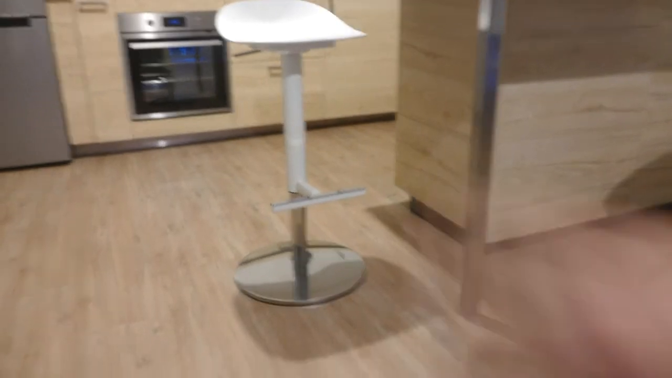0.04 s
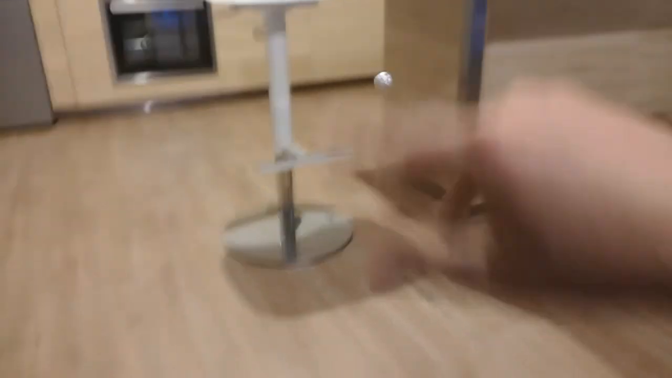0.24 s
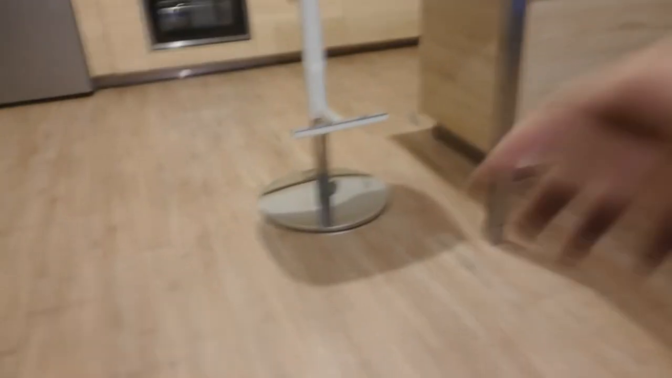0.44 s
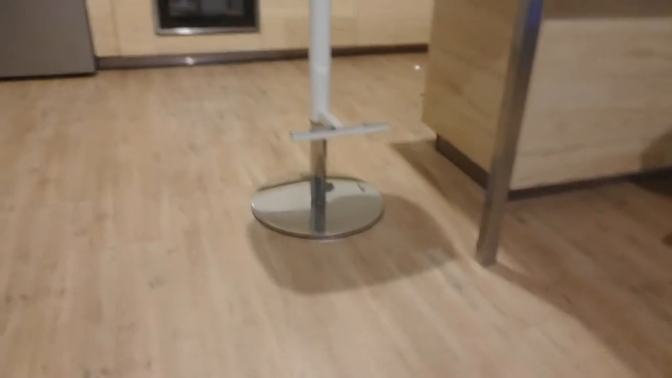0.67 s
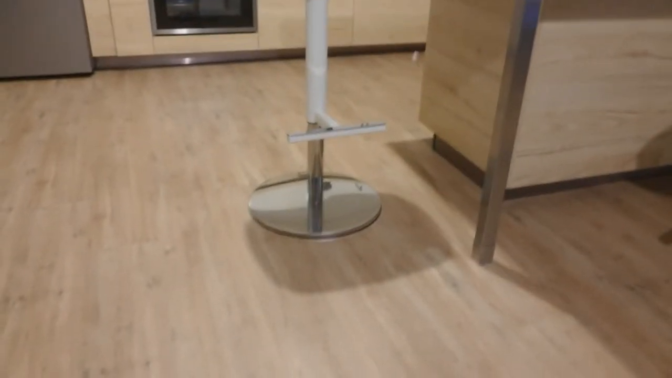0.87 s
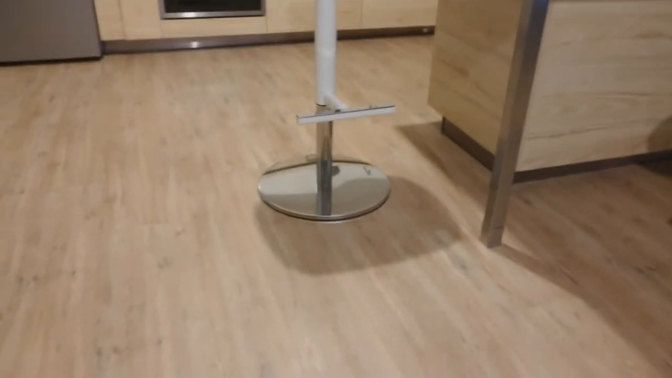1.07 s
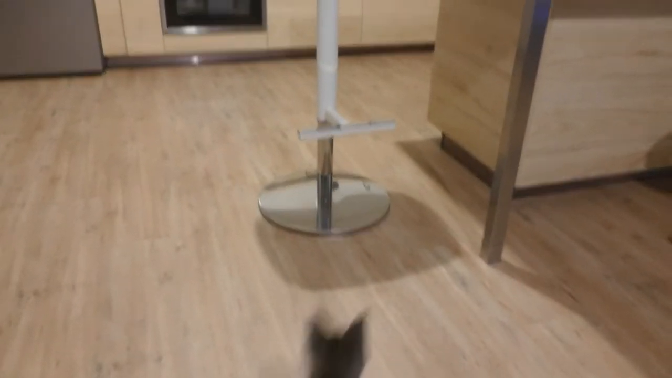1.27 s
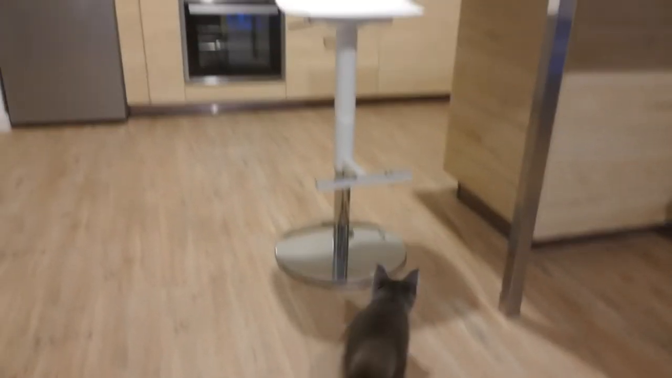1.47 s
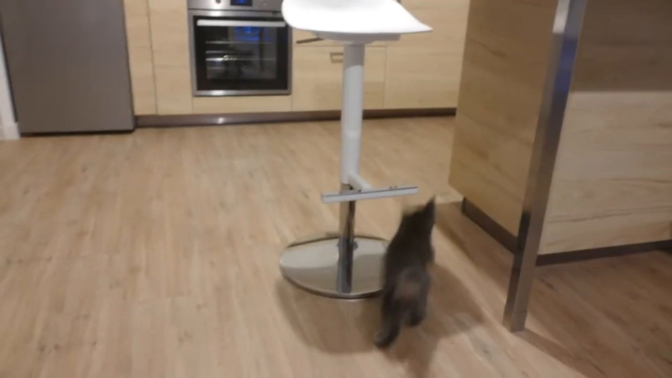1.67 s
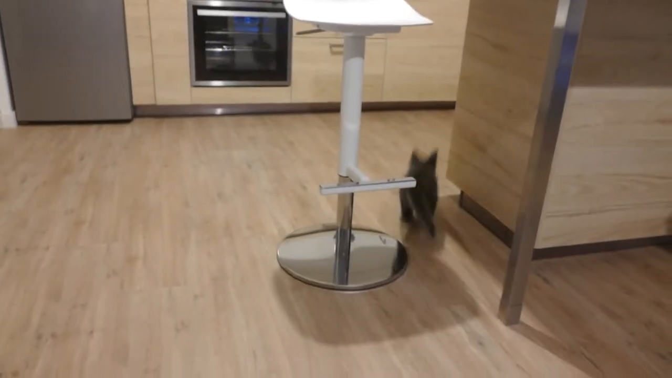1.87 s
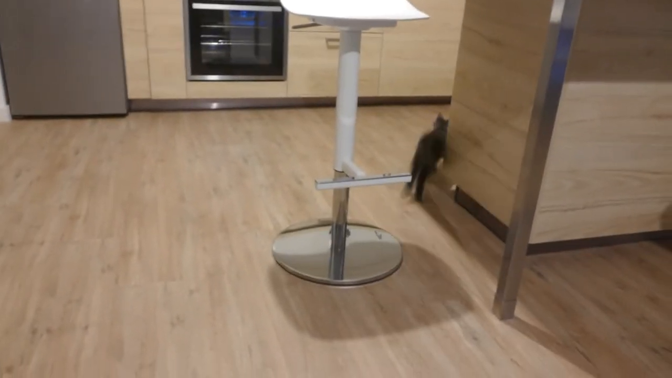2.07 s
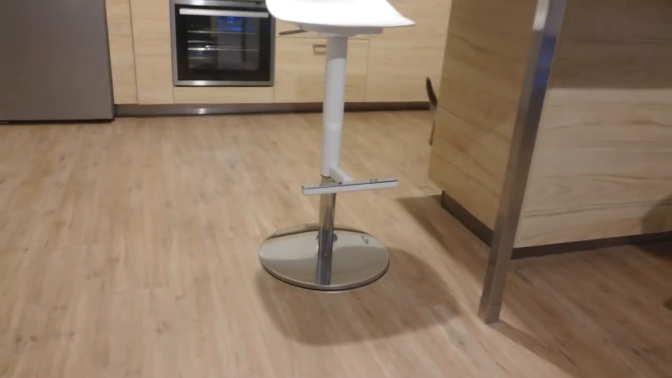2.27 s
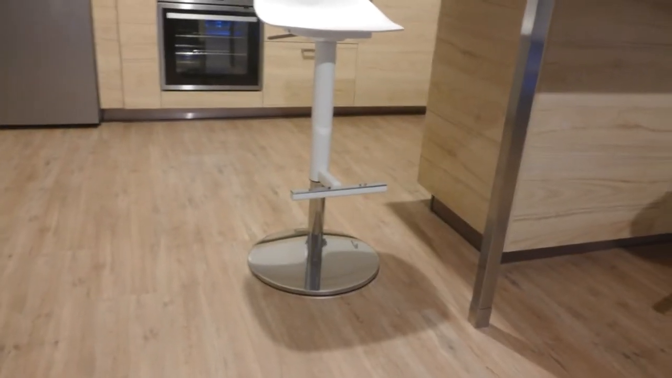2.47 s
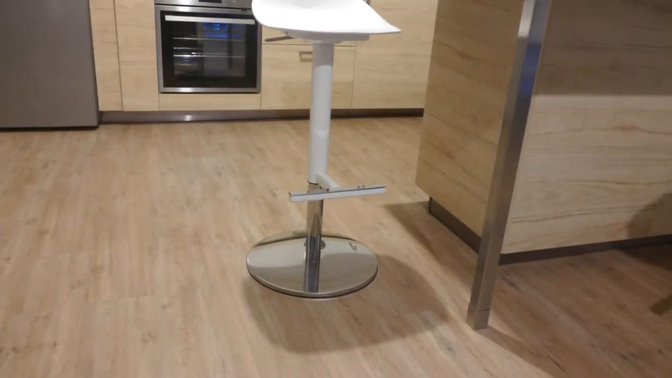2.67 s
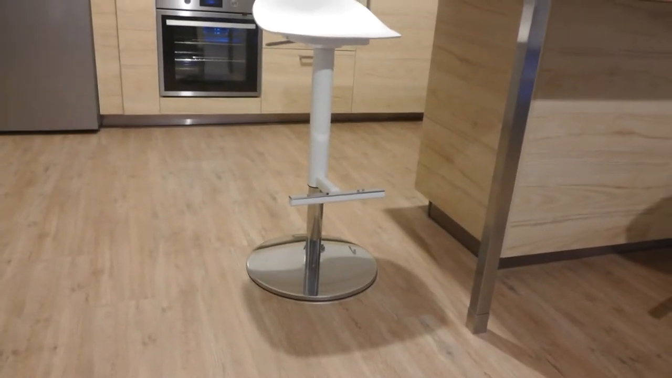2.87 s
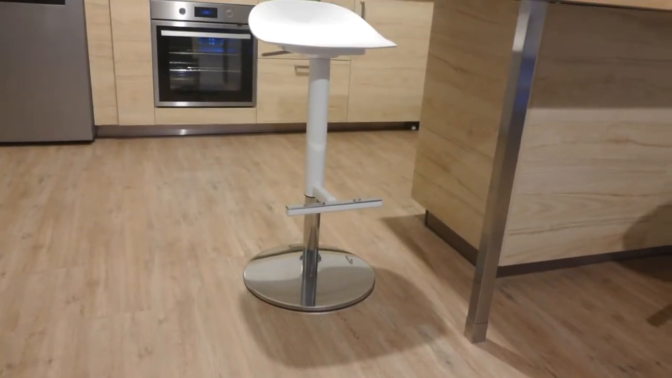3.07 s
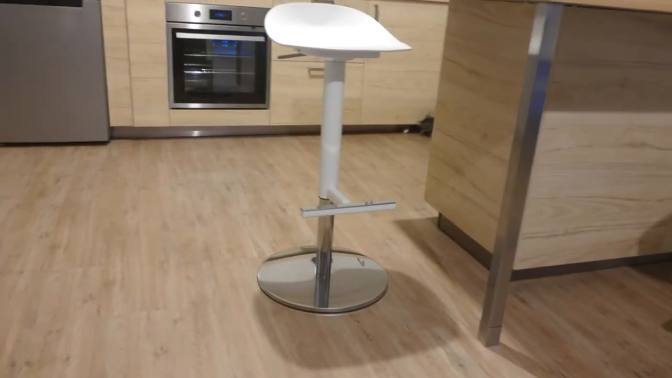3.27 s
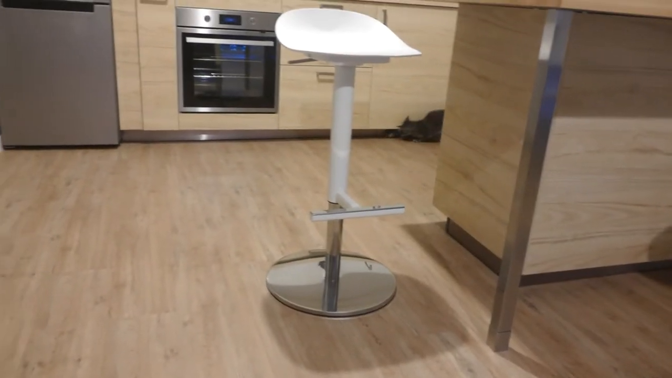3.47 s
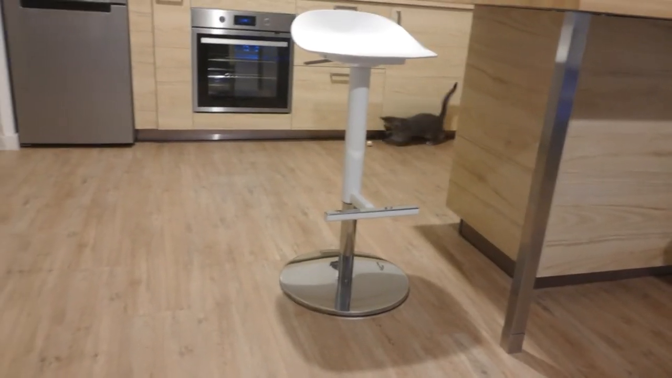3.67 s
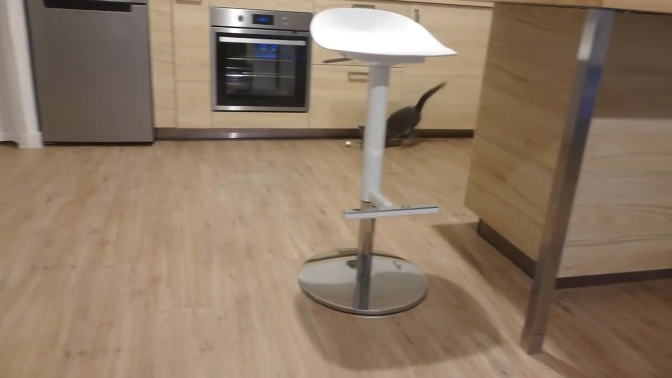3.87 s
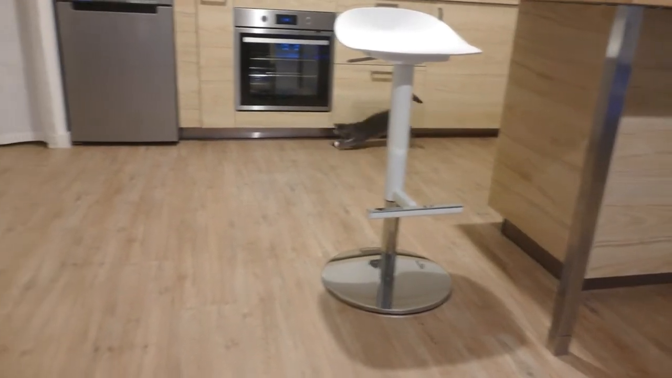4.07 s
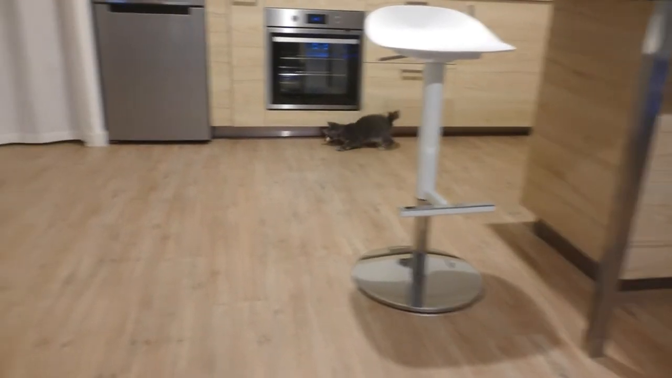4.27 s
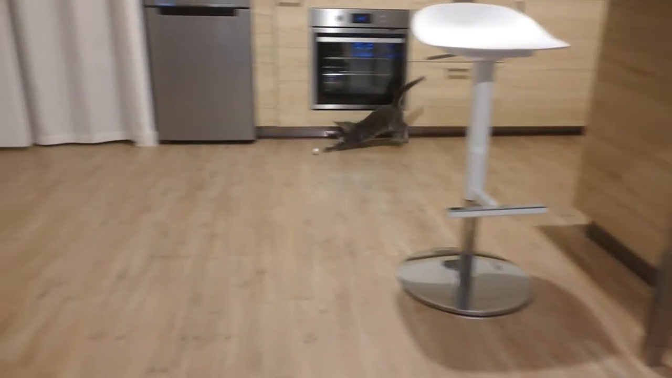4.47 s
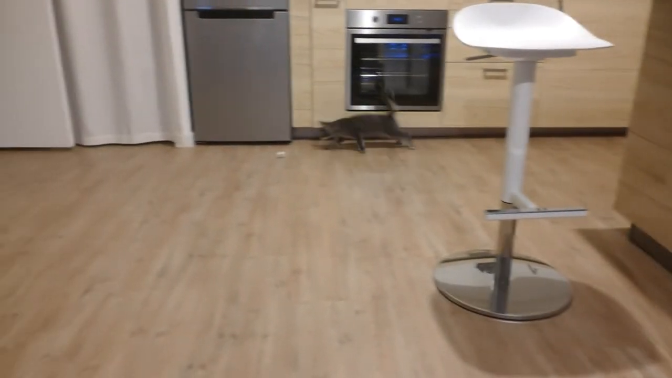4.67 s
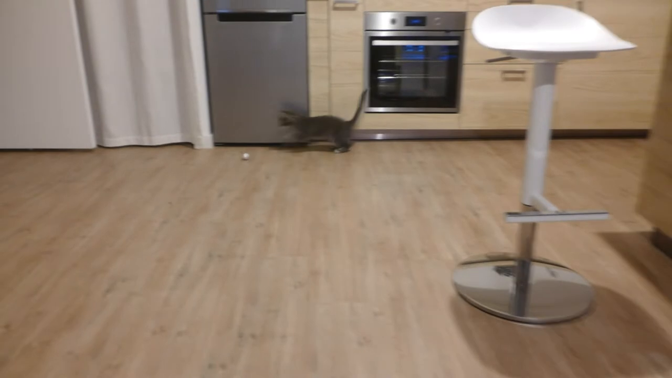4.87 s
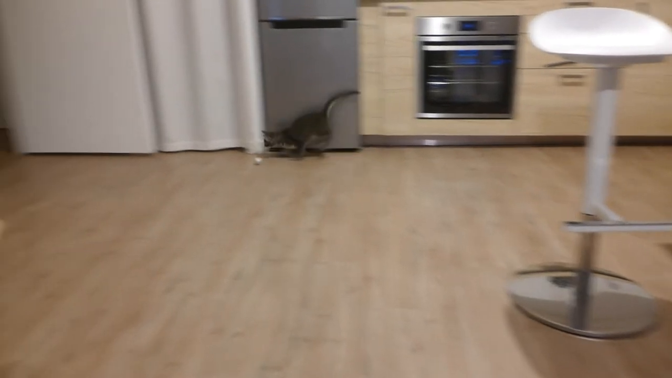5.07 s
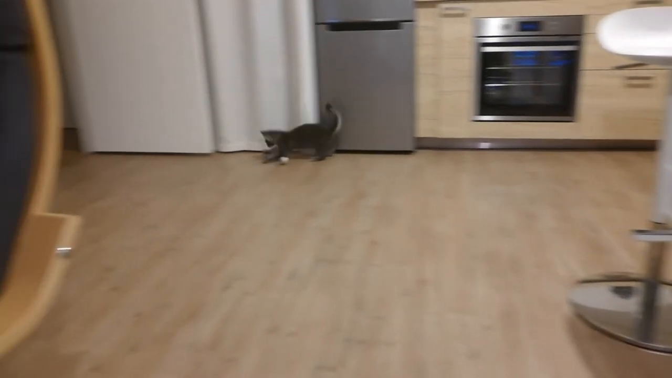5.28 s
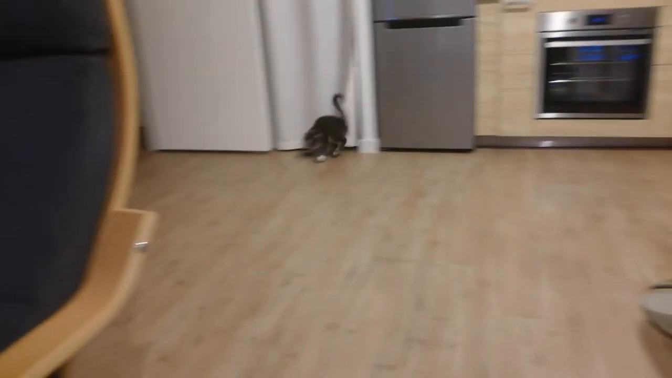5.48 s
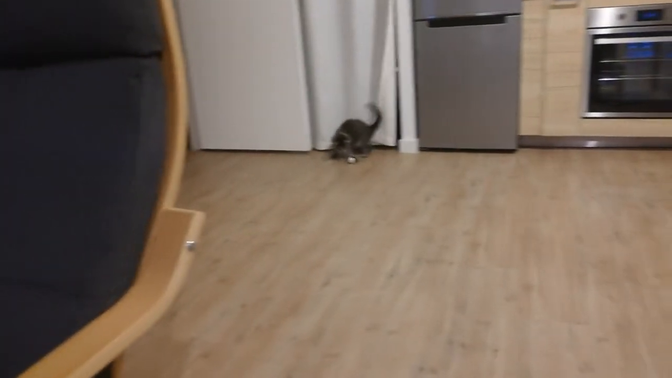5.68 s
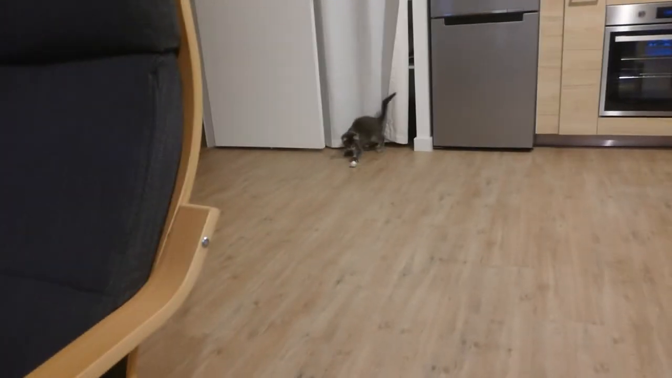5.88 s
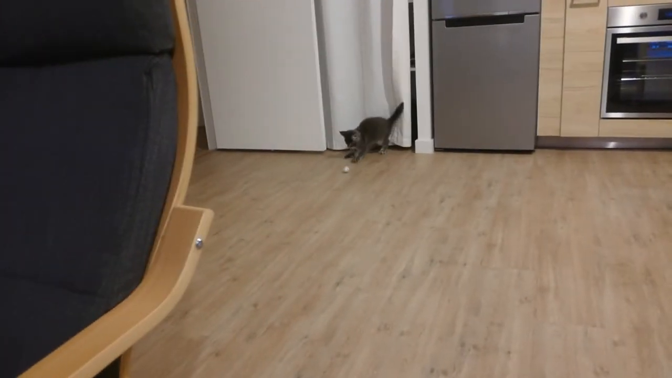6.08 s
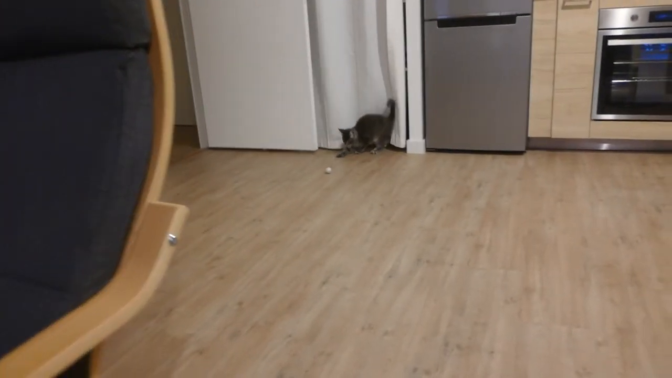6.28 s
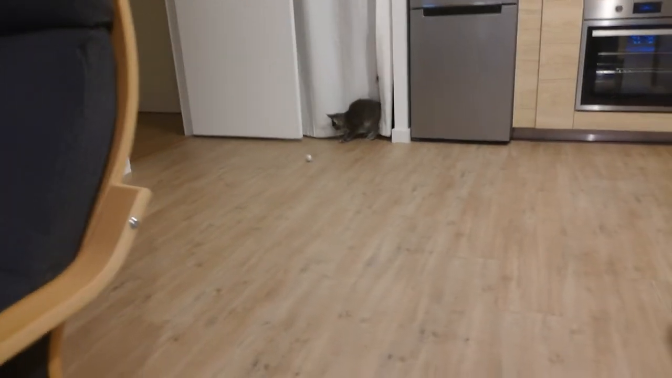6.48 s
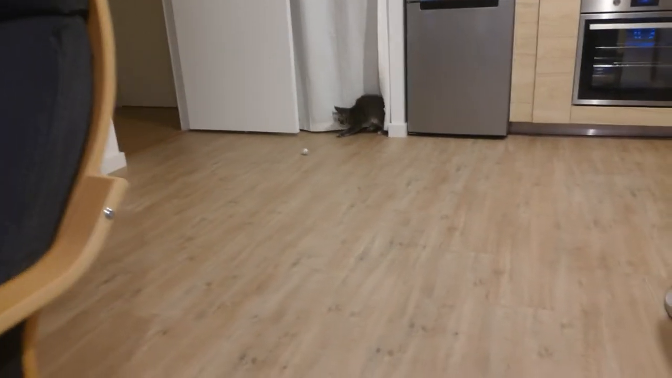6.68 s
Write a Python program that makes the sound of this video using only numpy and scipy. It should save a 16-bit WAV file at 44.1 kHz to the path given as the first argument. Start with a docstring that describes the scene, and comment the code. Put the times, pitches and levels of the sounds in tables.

```python
"""Kitchen with a laminate floor: a thrown ball of crumpled foil bounces and knocks a cabinet panel.
A kitten trots after it and bats it about, so that it skitters; the bare room rings long and bright.
Contacts are filtered blows with snapping facets, the skitter is random taps and a sliding scrape,
the panel is a bank of twin modes; all go through noise-tap room paths over a filtered-noise hush."""
import sys
import numpy as np
from scipy import signal
from scipy.fft import rfft, irfft
from scipy.io import wavfile
from scipy.ndimage import uniform_filter1d

SR = 44100
rng = np.random.default_rng(int(sys.argv[2]) if len(sys.argv) > 2 else 0)


def put_to_file(sound):
    """Save the sound as 16-bit audio at rate SR, in the file named by the first command-line argument."""
    columns = np.atleast_2d(sound).T  # one column per channel
    safe = np.clip(columns, -1, 1)
    whole_steps = np.round(safe * 32767)
    wavfile.write(sys.argv[1], SR, whole_steps.astype(np.int16))


N = 297234

# bands of a contact: thud, knock, tick, crackle; (low edge [Hz], high edge [Hz])
BAND_HZ = [(90, 550), (550, 1300), (1300, 3500), (3500, 16000)]
# spectrum of the foil ball on the floor: (frequency [Hz], density [dB per Hz])
FOIL_SPECTRUM = [(47, -59), (80, -22), (166, -8.5), (289, -5.5), (331, -6), (431, -3), (643, -1.5),
                 (896, -4), (1990, -6.5), (4330, -10.5), (5400, -16.5), (7530, -10.5), (10300, -27.5),
                 (14000, -32.5), (16000, -41)]


def gain_of(db):
    """Decibels to gain."""
    return 10 ** (np.asarray(db) / 20)


def evened(x):
    """Scales to rms 1."""
    return x / np.sqrt(np.mean(x ** 2) + 1e-20)


def read(points, hz):
    """Value of a spectrum table at hz, interpolated over log frequency."""
    f, value = np.transpose(points)
    return np.interp(np.log(hz + 1), np.log(f + 1), value)


def over_time(points, s):
    """Value of a time table at s, linearly interpolated."""
    return np.interp(s, *np.transpose(points))


def add(mix, s, sound):
    """Mixes a sound in at time s."""
    part = mix[..., round(s * SR):][..., :sound.shape[-1]]
    part += sound[..., :part.shape[-1]]


def band(x, lo_hz, hi_hz):
    """Causal band-pass."""
    return signal.sosfilt(signal.butter(2, [lo_hz, hi_hz], "band", fs=SR, output="sos"), x)


def bump(hz, ring_hz, width):
    """Bell of height 1 around a ring; width is the half-width as a share of its pitch."""
    return 1 / (1 + ((hz - ring_hz) / (width * ring_hz)) ** 2)


def causal(db):
    """Minimum-phase response with the gain db over the full circle of 4096 bins, cut at 1500 samples."""
    log_gain = np.log(gain_of(np.maximum(db, -140)))
    spectrum = np.exp(np.conj(signal.hilbert(log_gain)))
    return np.fft.ifft(spectrum).real[:1500]


def resonate(x, hz, width_hz):
    """Moving resonance: shifts the curve hz down to zero, smooths twice, shifts back."""
    turn = np.exp(2j * np.pi * np.cumsum(hz) / SR)
    r = np.exp(-np.pi * width_hz / SR)
    smooth = signal.lfilter([(1 - r) ** 2], [1, -2 * r, r * r], x / turn)
    return 2 * (turn * smooth).real


def ports(pair):
    """Makes two unrelated signals alike in the bass, as at two close microphone ports."""
    # (frequency [Hz], left-right likeness [0-1])
    likeness = [(60, 0.82), (150, 0.72), (380, 1), (950, 0.22), (2380, 0.17), (5980, 0.022), (15000, 0.16)]
    a, b = rfft(pair)
    same = read(likeness, np.fft.rfftfreq(pair.shape[1], 1 / SR))
    return irfft(np.array([a, same * a + np.sqrt(1 - same ** 2) * b]), pair.shape[1])


def noise_band(lo_hz, hi_hz):
    """Stereo noise of rms 1, band-passed twice."""
    noise = ports(rng.standard_normal((2, N)))
    return evened(band(band(noise, lo_hz, hi_hz), lo_hz, hi_hz))


def air():
    """Still room: hush with drifting spectral patches, swelling bass noise, a drone as of kitchen machines."""
    # hush spectrum before levelling: (frequency [Hz], density [dB per Hz])
    hush_spectrum = [(15, -49), (25, -1), (55, -14.5), (82, -17.5), (236, -1), (270, -10), (354, -13),
                     (1190, -18), (1370, -18.5), (1790, -23), (2050, -14.5), (2690, -23.5), (6050, -25),
                     (7710, -21.5), (16000, -50)]
    # bass in the room: (time [s], level [dB])
    low_swell = [(0.0, -65.5), (0.47, -68.5), (1.1, -66.5), (1.3, -57), (1.78, -69), (2.4, -67.5),
                 (3.19, -70), (3.6, -69), (3.88, -58), (4.5, -73), (4.92, -63.5), (5.7, -68.5), (6.4, -78),
                 (6.74, -65)]
    hush_db, patch_db, drone_db = -64.5, 2.2, -73
    frames, hz = N // 256 + 5, np.fft.rfftfreq(1024, 1 / SR)
    re, im = rng.standard_normal((2, 2, 513, frames))
    patches = uniform_filter1d(rng.standard_normal((513, frames)), 12, 0)
    patches = evened(uniform_filter1d(patches, 14, 1))
    bins = (re + 1j * im) * gain_of(read(hush_spectrum, hz)[:, None] + patch_db * patches)
    hush = signal.istft(bins, nperseg=1024, noverlap=768)[1]
    out = gain_of(hush_db) * evened(ports(hush[:, :N]))
    out += gain_of(over_time(low_swell, np.arange(N) / SR)) * noise_band(64.0, 147.0)
    return out + gain_of(drone_db) * noise_band(44.5, 68.0)


def room_tail():
    """Sparse taps of random sign, each band dying at its own speed, plus a few strong reflections."""
    # (frequency [Hz], t60 [s])
    room_t60 = [(120, 0.67), (320, 0.67), (840, 0.55), (2210, 0.77), (5820, 0.64)]
    # first reflections: (delay [ms], level over the tail [dB])
    walls = [(8.0, -11), (12.5, -19), (17.0, -16), (22.0, -20), (30.0, -18)]
    sparse = np.zeros((2, SR))
    at = np.arange(80, SR - 20, 20) + rng.integers(0, 20, (2, (SR - 81) // 20))
    np.put_along_axis(sparse, at, rng.choice([-1., 1.], at.shape), 1)
    hz, t, z = signal.stft(ports(sparse), SR, nperseg=512)
    fall = gain_of(-60 * t / read(room_t60, hz)[:, None])
    tail = signal.istft(z * fall, SR, nperseg=512)[1][:, :SR]
    tail = tail * (1 - np.exp(-np.arange(SR) / SR / 0.00043))  # echoes thicken in the first moments
    tail = tail / np.linalg.norm(tail[0])
    for ms, db in walls:
        # cupboards and tiles scatter each echo
        smear = rng.standard_normal((2, 40)) * np.exp(-np.arange(40) / 54.0)
        smear = smear / np.linalg.norm(smear, axis=1, keepdims=True)
        add(tail, ms / 1000, gain_of(db) * ports(smear))
    return tail


def thumps():
    """Soft low bumps, perhaps paws landing: each is a low ring that swells in and sags in pitch."""
    # (time [s], level [dB], settled pitch [Hz])
    bumps = [(0.11, -50, 86.1), (1.727, -101.5, 217), (2.01, -49, 91), (2.501, -42, 128),
             (2.734, -47.5, 268), (3.859, -47, 235), (3.921, -48, 96.9), (4.318, -41, 185),
             (4.937, -59, 295), (6.327, -49.5, 219), (6.455, -46, 279)]
    t60_s = 0.042
    t, out = np.arange(SR // 4) / SR, np.zeros(N)
    for s, db, hz in bumps:
        ring = np.sin(2 * np.pi * hz * t * (1 + 0.23 * np.exp(-t / 0.0096)))
        add(out, s, gain_of(db - 60 * t / t60_s) * ring * (1 - np.exp(-t / 0.0025)))
    return out


def panel():
    """The hollow panel booms on its modes when struck; each mode has a close twin that beats with it."""
    # hollow cabinet panel: (frequency [Hz], level relative to the blow [dB], t60 [s])
    modes = [(116.4, -12, 0.4), (235, 4, 0.14), (286, 2.5, 0.11), (333, 1, 0.11), (379.3, -5, 0.2),
             (466, 1.5, 0.27), (543, -7, 0.21), (674, -15, 0.47), (816, -34.5, 1), (875, -31.5, 0.59)]
    # (time [s], level [dB], treble lean [dB per mode])
    blows = [(1.142, -22.5, 0.33), (3.032, -31, 1.02)]
    t, out = np.arange(SR) / SR, np.zeros(N)
    for s, blow_db, lean_db in blows:
        detunes = rng.uniform(0.0236, 0.043, len(modes)) * rng.choice([-1., 1.], len(modes))
        boom = np.zeros(SR)
        for k, (hz, db, t60_s) in enumerate(modes):
            twin = 1.44 * np.sin(2 * np.pi * hz * (1 + detunes[k]) * t)
            boom += gain_of(db + lean_db * k - 60 * t / t60_s) * (np.sin(2 * np.pi * hz * t) + twin)
        add(out, s, gain_of(blow_db) * boom * (1 - np.exp(-t / 0.0094)))
    return out


def rolling():
    """Gains of crackle and scrape: each push starts the ball, which loses speed, touches unevenly, stops."""
    # (start [s], length [s], crackle before mixing [dB], scrape before mixing [dB])
    pushes = [(0.09, 0.028, -67, -86), (0.245, 0.063, -64.5, -75), (1.44, 0.05, -47.5, -51),
              (2.745, 0.59, -54.5, -54.5), (3.166, .18, -49.5, -57), (3.335, 0.089, -55.5, -51.5),
              (3.553, 0.4, -41.5, -50.5), (3.801, 0.23, -47.5, -44.5), (4.05, 0.29, -45.5, -44.5),
              (4.299, 0.21, -46, -57), (4.467, 0.25, -41, -43), (4.667, 0.094, -37.5, -47),
              (4.847, 0.19, -46.5, -47.5), (5.068, 0.19, -46.5, -46.5), (5.263, 0.11, -49.5, -48.5),
              (5.43, 0.14, -52.5, -50.5), (5.506, 0.11, -51, -58.5), (5.595, 0.11, -47, -46),
              (5.71, 0.16, -50.5, -51.5), (6.082, 0.23, -78, -61), (6.283, 0.36, -76, -66)]
    # loss of level: (crackle [dB/s], scrape [dB/s])
    slowing = (35.5, 23.5)
    push_s, stop_s = 0.013, 0.046
    clump_s, clump_db = 0.023, 2.5
    gains = np.zeros((2, N))
    for start, length, *levels_db in pushes:
        t = np.arange(0, length + stop_s, 1 / SR)
        moving = np.clip(np.minimum(t / push_s, (length + stop_s - t) / stop_s), 0, 1)
        add(gains, start, moving * gain_of(np.c_[levels_db] - np.outer(slowing, t)))
    size = round(clump_s * SR)
    clumps = uniform_filter1d(rng.standard_normal((2, N)), size)
    clumps = evened(uniform_filter1d(clumps, size))
    return gains * gain_of(clump_db * clumps)


def taps(per_s, spread_db):
    """Facets tapping the floor at random; a few taps are large."""
    size = gain_of(spread_db * np.minimum(rng.exponential(1, N), 3.5)) * rng.choice([-1., 1.], N)
    return evened(size * (rng.random(N) < per_s / SR))


def foil_colours():
    """Response of the ball on the floor, cut in four bands of energy 1."""
    response = causal(read(FOIL_SPECTRUM, abs(np.fft.fftfreq(4096, 1 / SR))))
    parts = np.array([band(response, *edges) for edges in BAND_HZ])
    return parts / np.linalg.norm(parts, axis=1, keepdims=True)


def skitter():
    """Facet after facet of the rolling ball taps the floor; the scrape has a pitch that slides."""
    # (time [s], pitch [Hz])
    scrape_pitch = [(0, 750), (2.7, 1065), (3.1, 640), (3.37, 900), (3.57, 710), (3.71, 990), (4.0, 684),
                    (4.3, 750), (4.4, 1200), (4.47, 1280), (4.56, 1570), (4.639, 1150), (4.72, 1000),
                    (4.8, 670), (5.1, 706), (5.3, 483), (5.6, 540), (5.85, 615), (6.74, 700)]
    grains_per_s, knocks_per_s = 1200, 220  # fine facets, larger bumps of the ball
    tick_over_crackle_db, rumble_over_scrape_db = -5, -13
    thud_colour, _, tick_colour, crackle_colour = foil_colours()
    crackle, scrape = rolling()
    hz = over_time(scrape_pitch, np.arange(N) / SR)
    out = scrape * evened(resonate(taps(knocks_per_s, 6.5), hz, 495.0))
    layers = [(crackle, crackle_colour),
              (crackle * gain_of(tick_over_crackle_db), tick_colour),
              (scrape * gain_of(rumble_over_scrape_db), thud_colour)]
    for gain, colour in layers:
        out += signal.oaconvolve(taps(grains_per_s, 4.9) * gain, colour)[:N]
    return out


def hits(table, kind):
    """Each contact is one blow and a scatter of snapping facets; returns near pair and three room feeds."""
    # where the contacts fall: (time [s], left-right before the kind's own [dB])
    place = [(0, 18), (1.2, 0), (2.0, -2.5), (3.0, 3), (3.4, 3.5), (4.5, -1.5), (6.74, 3.5)]
    shell_hz, shell_width = 2620, 0.11  # a ring of the ball that every contact shares
    blow_db, scatter, contact_ms, floor_db, pan_db = kind
    t, hz = np.arange(1000) / SR, abs(np.fft.fftfreq(4096, 1 / SR))
    foil_db = read(FOIL_SPECTRUM, hz)
    foil_power = gain_of(2 * foil_db)
    band_db = [10 * np.log10(np.mean(foil_power * (hz > lo) * (hz < hi))) for lo, hi in BAND_HZ]
    middles_hz = [np.sqrt(lo * hi) for lo, hi in BAND_HZ]
    near, feeds = np.zeros((2, N)), np.zeros((3, N))
    for k, (s, peak_db, thud_db, tick_db, crackle_db, floor_hz, foil_hz, room_db) in enumerate(table):
        snaps = ports(rng.standard_normal((2, len(t))))
        burst = scatter * snaps * np.exp(-1000 * t / contact_ms)
        burst[:, 0] = 1  # the first blow
        burst = burst / np.linalg.norm(burst, axis=1, keepdims=True)
        shares_db = [thud_db, 0, tick_db, crackle_db]
        tilt_db = read(np.transpose([middles_hz, np.subtract(shares_db, band_db)]), hz)
        rings_db = floor_db * bump(hz, floor_hz, 0.066) + 7.43 * bump(hz, foil_hz, 0.11)
        rings_db += 3.46 * bump(hz, shell_hz, shell_width)
        blow = causal(foil_db + tilt_db + rings_db) * gain_of(peak_db + blow_db)
        side_db = np.c_[[.5, -.5]] * (pan_db + over_time(place, s))
        add(near, s, signal.fftconvolve(burst, blow[None], axes=1) * gain_of(side_db))
        add(feeds[k % 3], s, blow * gain_of(room_db))
    return near, feeds


def scene():
    """Near sound plus three paths through the room, over the hush."""
    # both contact tables: (time [s], knock peak before the kind's blow level [dB], thud over knock [dB],
    # tick over knock [dB], crackle over knock [dB], floor ring [Hz], foil ring [Hz], room over near [dB])
    # bounces of the ball and footfalls far across the floor
    bounces = [(0.514, -14, -14, -10, -3, 846, 4360, 9.44), (0.847, -29, -6.5, -3, 0, 690, 1740, 12.2),
               (1.082, -27.5, -23.5, -7, -3.5, 996, 1750, 8.6),
               (1.141, -13.5, 1.5, -10.5, -8, 570, 1740, 11.2), (1.496, -42, 1, -1, -7, 584, 2540, 8.5),
               (1.714, -43, -9, -10.5, -3.5, 1080, 1960, 10), (1.773, -50, -1, -10, -8, 581, 1900, 9.3),
               (1.987, -42, -13, -14.5, -8, 830, 1480, 4.6), (2.011, -53.5, 2, -15, -5, 593, 1450, 10.5),
               (2.108, -38, -24, -9.5, -9, 750, 1630, 3.7), (2.449, -43, -5.5, -6.5, -8, 1220, 1580, 11.9),
               (2.488, -47.5, -9, -15, -5, 807, 1480, 9.5), (2.739, -39.5, -26, -9.5, -16, 1120, 1730, 9.3),
               (2.772, -52.5, -19, 0, 8, 969, 1630, 11), (2.891, -53, -10, -6, 10, 700, 1710, 14.8),
               (3.031, -24.5, 7, -5.5, -2.5, 575, 1920, 6.8),
               (3.189, -36.5, -19, -17, -26, 566, 2080, 14.4), (3.475, -40, -13, -23, -12, 576, 1690, 10),
               (3.521, -33, -15, -13, -10.5, 640, 1750, 14.8), (3.564, -31, -11, -5, -3, 651, 3840, 11.2),
               (3.742, -42.5, -5, 1.5, 9.5, 1140, 1780, 8.6), (3.816, -40, -13, 4.5, -0.5, 730, 1610, 13.2),
               (4.041, -42, 5.5, 5, 3, 546, 1790, 10), (4.151, -42, -1, 4, 1, 710, 2100, 12.6),
               (4.307, -43.5, -17, -7, 10, 900, 1680, 14), (4.472, -42.5, -14, 1.5, 3, 1280, 2170, 13),
               (4.491, -45.5, -12, 3, 12, 1270, 2790, 17), (4.624, -24.5, -39, -4.5, -27, 1080, 1460, 5.2),
               (4.681, -36, -28, -7, 4, 1200, 1470, 12.3), (4.793, -30.5, -15.5, -9, -15, 686, 1590, 10),
               (5.102, -43.5, 3, 4, -2, 867, 2150, 9), (5.253, -39.5, -6, 1, 6.5, 735, 1970, 6.8),
               (5.421, -40, -3, -9, 3, 540, 1530, 7.8), (5.599, -44, -16, -1.5, 5, 740, 3700, 10.8),
               (6.088, -45, 1, -8.5, 1.5, 670, 2010, 7.1), (6.28, -57, -12, 2, -0.5, 655, 2100, 11.3)]
    # short dry clicks with little echo
    dry_clicks = [(0.08, -57.5, -21, -13, 2, 746, 1670, -11), (0.118, -60.5, 3, -19, 10.5, 663, 3890, 2),
                  (0.385, -61, 19.5, -13, -12, 567, 2110, -8), (0.411, -58.5, 22, -16, -17, 543, 2280, -8),
                  (0.856, -26.5, -7, -12, -8.5, 730, 1910, -7), (1.093, -31.5, -8.5, 0, -28, 955, 1730, -1),
                  (2.293, -36.5, -32, -14, -23, 1000, 1760, -18),
                  (2.305, -31.5, -19, -14, -19, 703, 1860, -10),
                  (2.323, -36, -27.5, -16, -20, 715, 1530, -20), (2.356, -42, -25, -10, -5, 750, 1560, 0.5),
                  (2.572, -47, -5, -13, -12, 945, 1640, -7), (2.587, -39, -34, -8, -14.5, 694, 1690, -18),
                  (2.604, -48.5, -22, -5, -9, 1230, 1680, -17),
                  (2.963, -23.5, -18, -10, -10.5, 580, 1760, -3), (2.998, -30, -5, -6, -14, 890, 1920, -27),
                  (3.533, -30, -27, -20, -6.5, 770, 1720, -12),
                  (3.542, -23.5, -14, -23, -15, 647, 1650, -3.5),
                  (4.267, -33.5, -15, -18, -6, 680, 2230, 1.5), (4.296, -32, -19, -14, -8, 650, 1650, -13),
                  (4.379, -45, -21, 4, 8, 1100, 1770, 2.5), (4.551, -53, -25, 17, 15, 1280, 1550, -4),
                  (4.586, -39, -46, 1, -3, 1270, 1420, -18), (4.728, -39, -37, 2.5, 2, 1060, 2200, -13),
                  (4.898, -33, -8, -6, -9, 920, 2050, 3.5), (4.93, -33, -13, -2.5, -6, 620, 1980, -10),
                  (5.019, -37.5, -5, -8, -13, 700, 1590, -6),
                  (5.043, -38.5, -1.5, -6, -6.5, 765, 2040, 0.5), (5.362, -38, -18, 1, -27, 770, 1650, 0.5),
                  (5.499, -41.5, -10, -5, -4, 576, 1400, -3), (2.332, -34.5, -22, -4, -14, 720, 2000, -14)]
    # shared by all contacts of a kind: (whole blow over its peak [dB], snaps against the first blow [ratio],
    # contact [ms], floor ring [dB], left-right before place is added [dB])
    bounce_kind = (11.5, 0.6, 1.8, 5.1, 1)
    click_kind = (17.5, 2.5, 5, 9, -3.5)
    near, feeds = hits(bounces, bounce_kind)
    clicks, click_feeds = hits(dry_clicks, click_kind)
    boom, roll = panel() + thumps(), skitter()
    # the roll cycles through the three paths every 0.9 s
    turn = 2 * np.pi * np.arange(N) / SR / .9 + 2 * np.pi / 3 * np.arange(3)[:, None]
    roll_feeds = gain_of(-3.5) * roll * np.cos(turn) * np.sqrt(2 / 3)
    feeds = feeds + click_feeds + roll_feeds + gain_of(-6.5) * boom
    wet = sum(signal.fftconvolve(feed[None], room_tail(), axes=1)[:, :N] for feed in feeds)
    roll_pair = np.array([roll, np.roll(roll, 9)])  # the far port hears it 9 samples later
    return near + clicks + gain_of(-9.5) * roll_pair + boom + wet + air()


def record(dry):
    """The microphone drops the deep bass and its two ports favour different bands; then the band limit."""
    # (frequency [Hz], left-right difference [dB])
    port_lean = [(60, -6), (130, -0.5), (290, -5.5), (640, -3.5), (1410, -2), (3100, -2.5), (6820, -10),
                 (15000, 6.5)]
    edge_hz = 15900
    half_db = read(port_lean, np.fft.rfftfreq(N, 1 / SR)) / 2
    leaned = irfft(rfft(dry) * gain_of([half_db, -half_db]), N)
    thin = signal.sosfilt(signal.butter(4, 46., "high", fs=SR, output="sos"), leaned)
    limit = signal.firwin(511, edge_hz, window=("kaiser", 9), fs=SR)
    return signal.oaconvolve(thin, limit[None], "same")


dry = scene()
out = record(dry)
put_to_file(out)
```